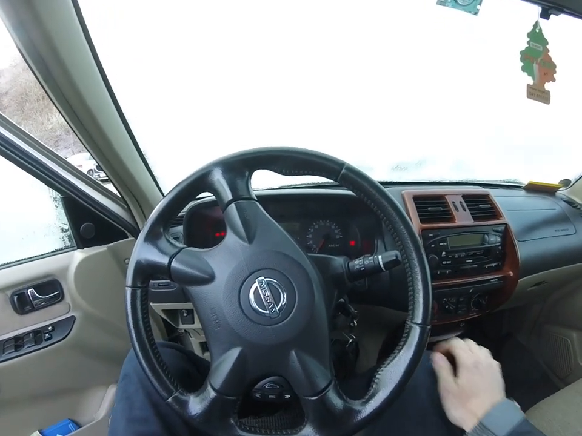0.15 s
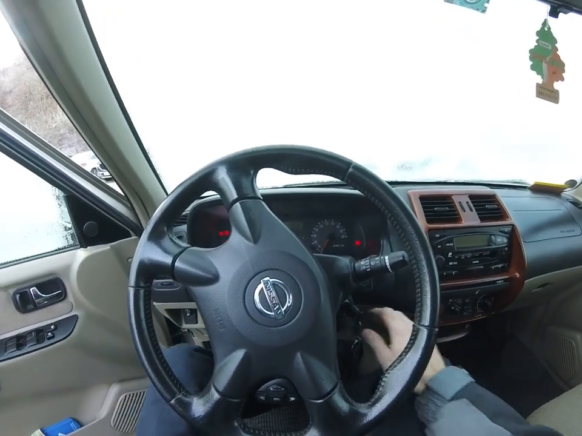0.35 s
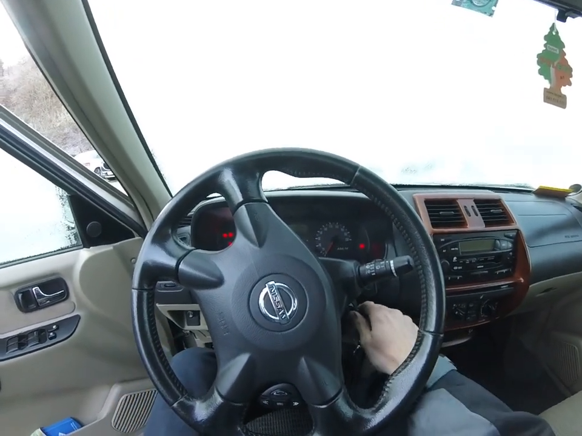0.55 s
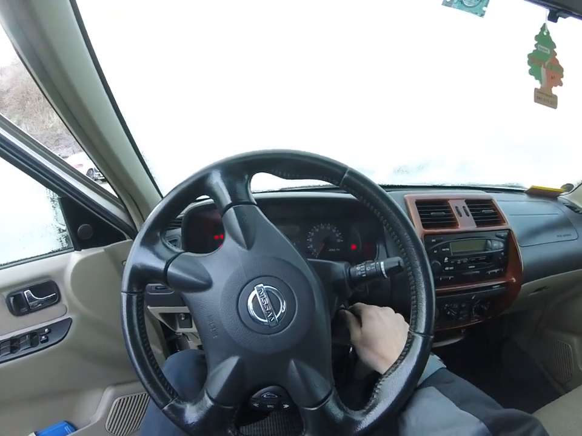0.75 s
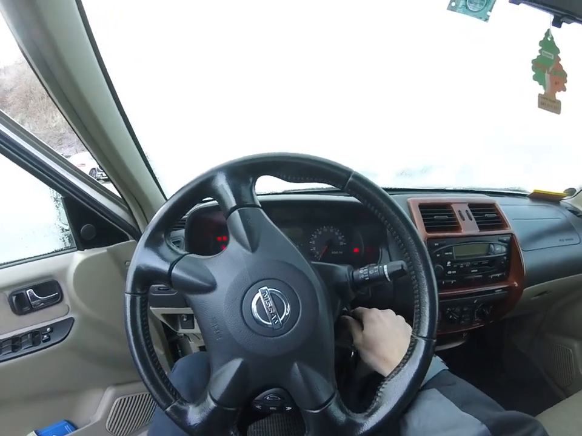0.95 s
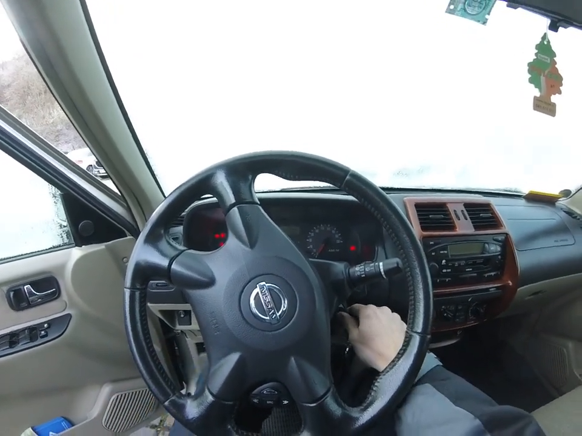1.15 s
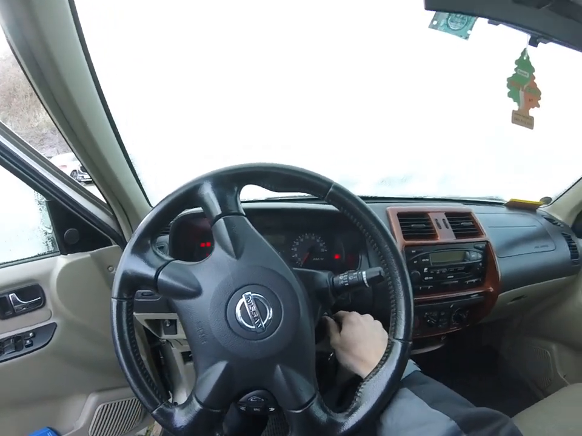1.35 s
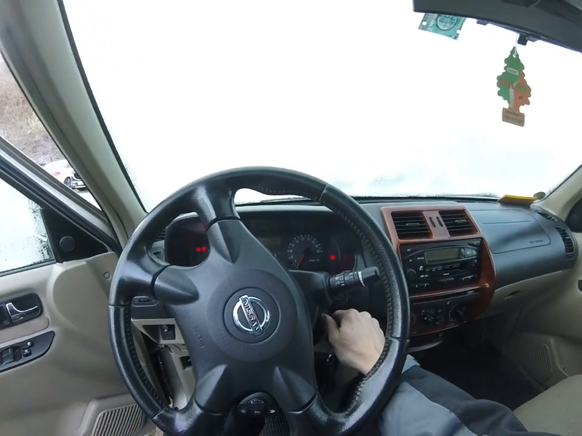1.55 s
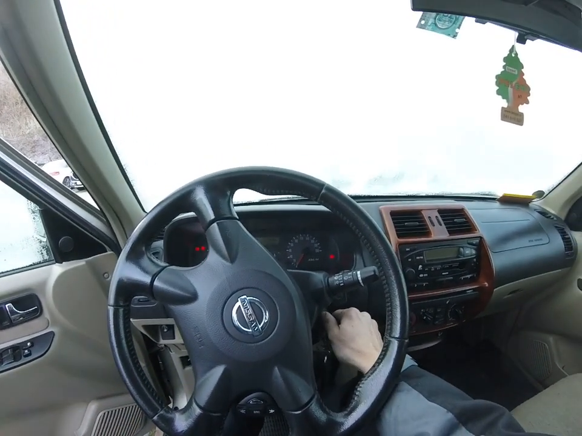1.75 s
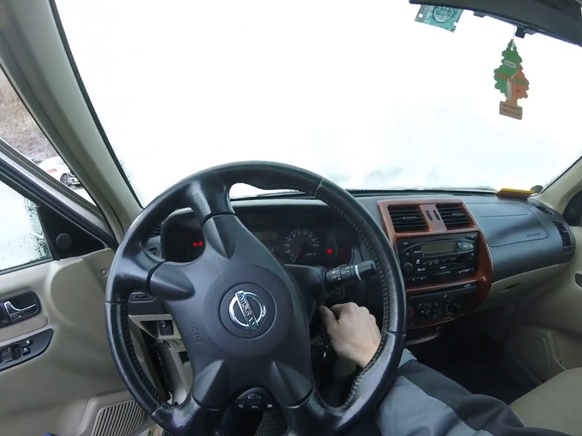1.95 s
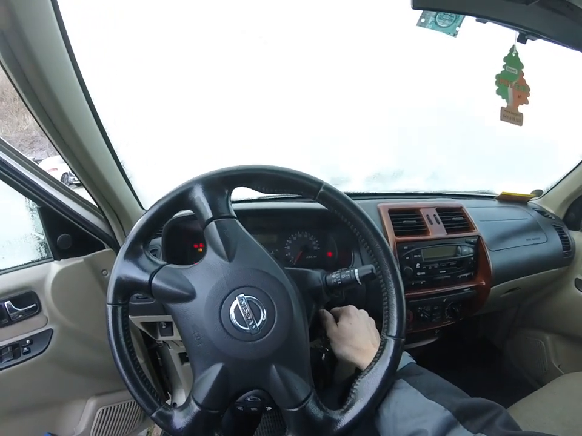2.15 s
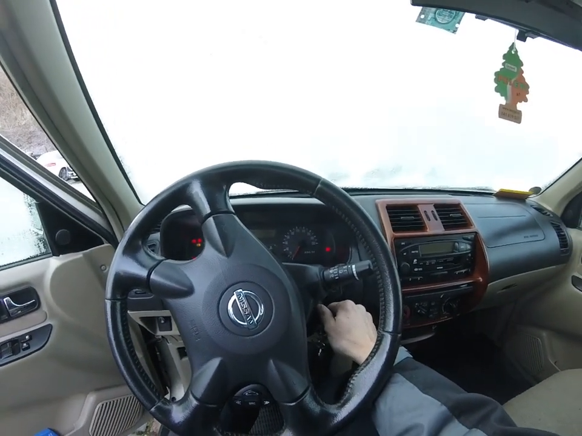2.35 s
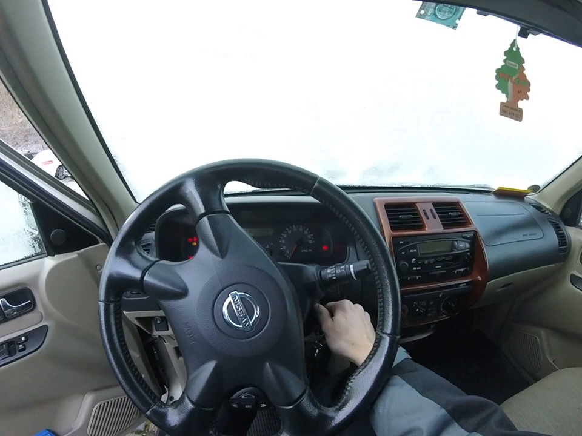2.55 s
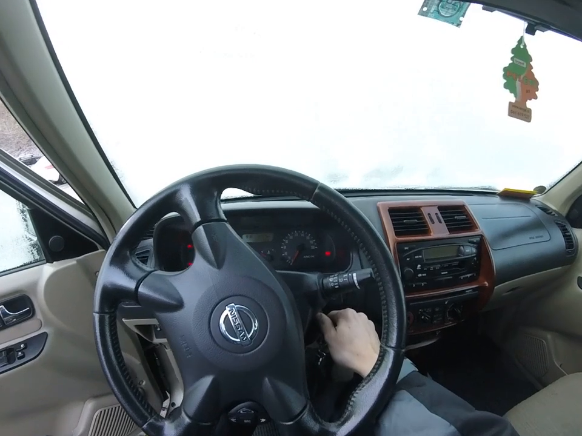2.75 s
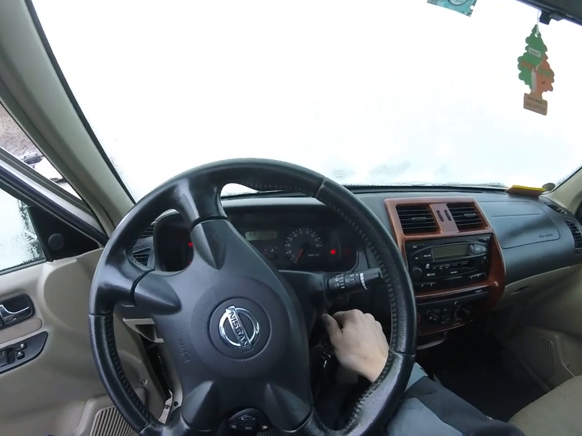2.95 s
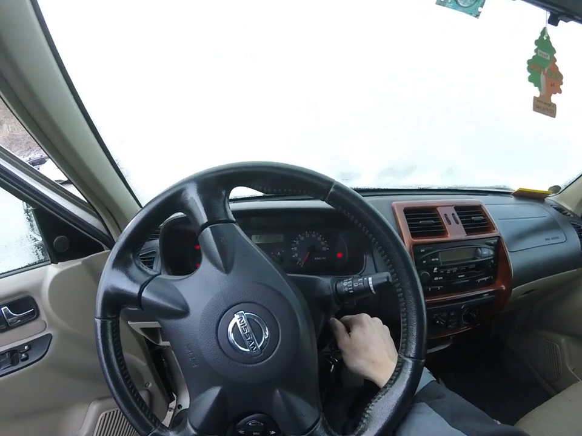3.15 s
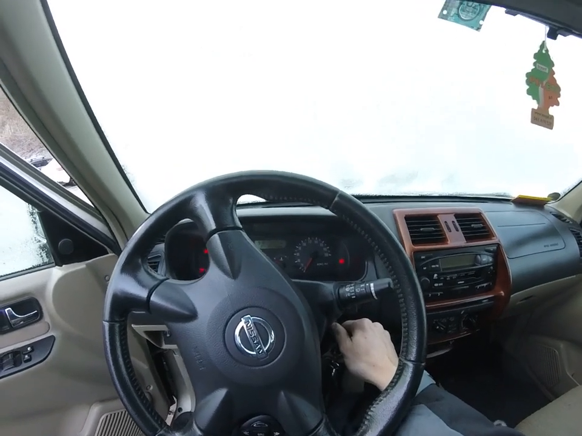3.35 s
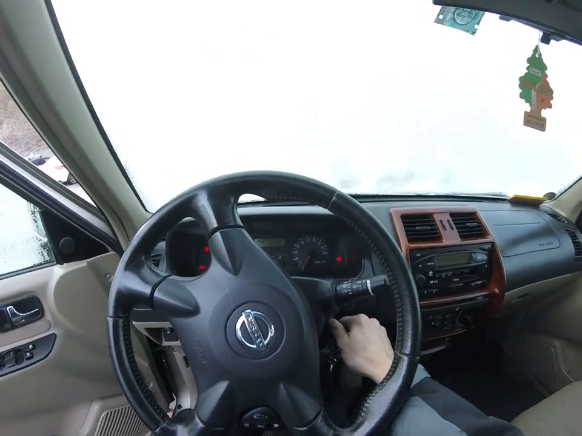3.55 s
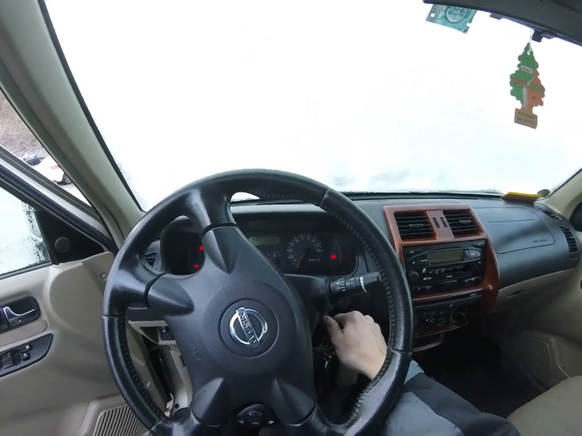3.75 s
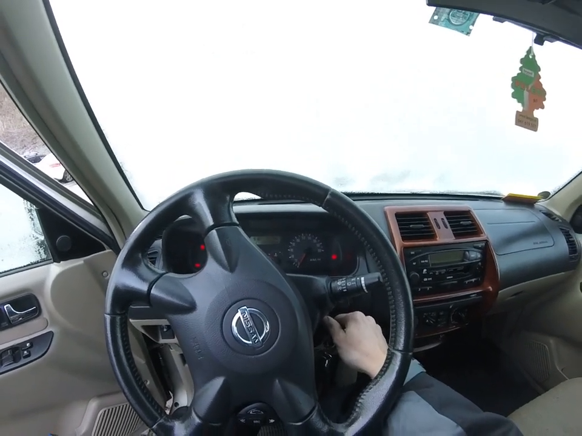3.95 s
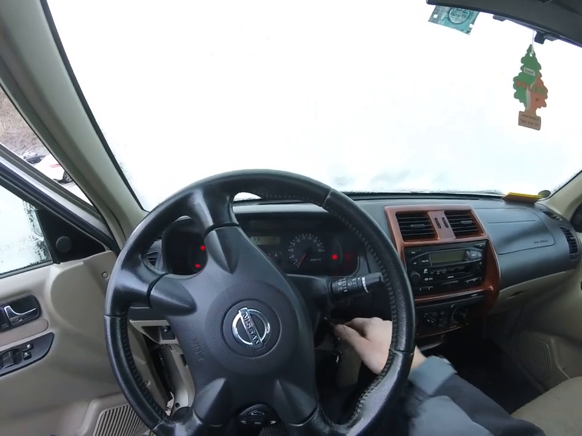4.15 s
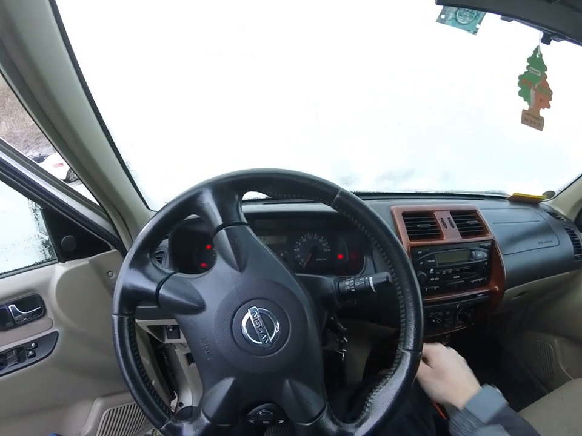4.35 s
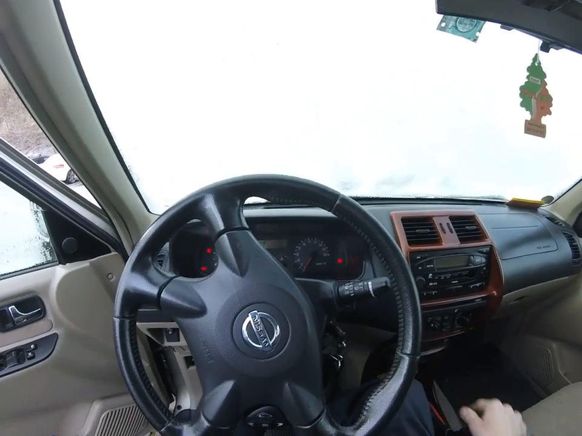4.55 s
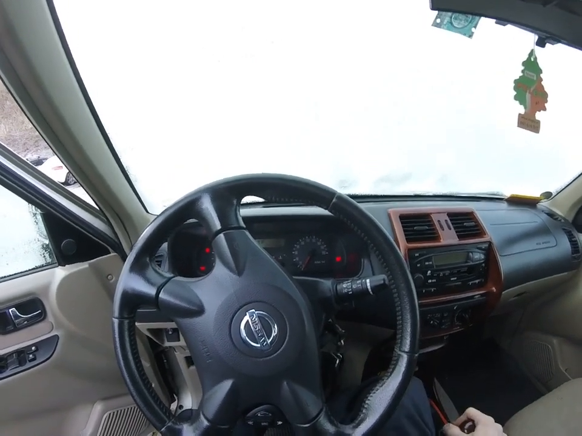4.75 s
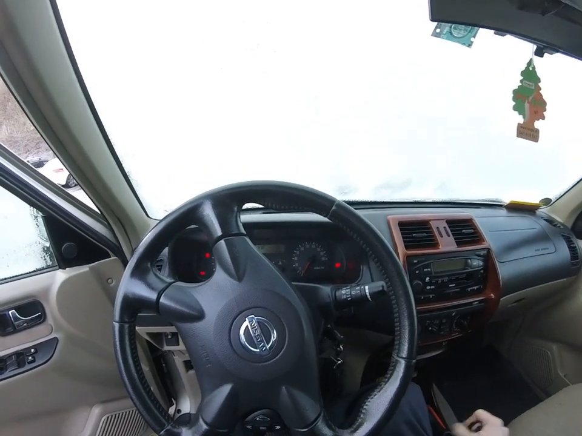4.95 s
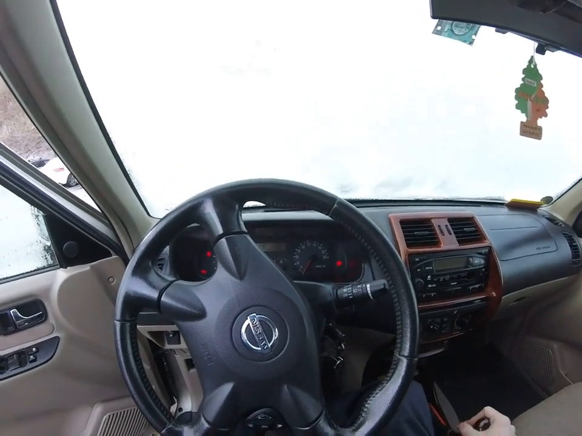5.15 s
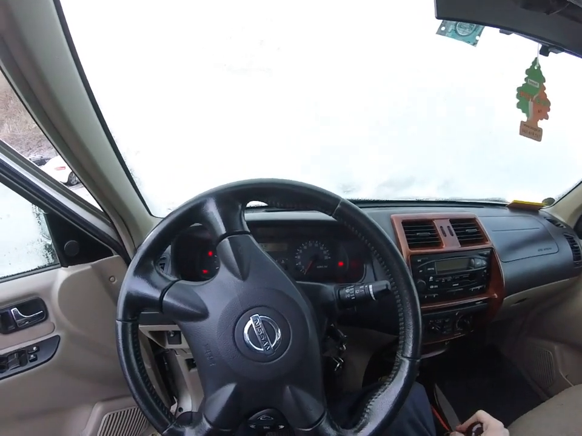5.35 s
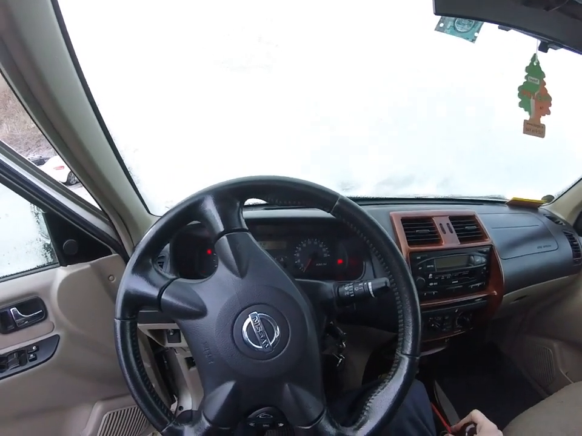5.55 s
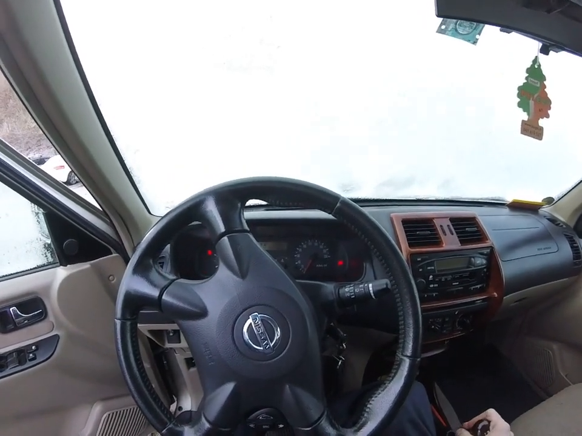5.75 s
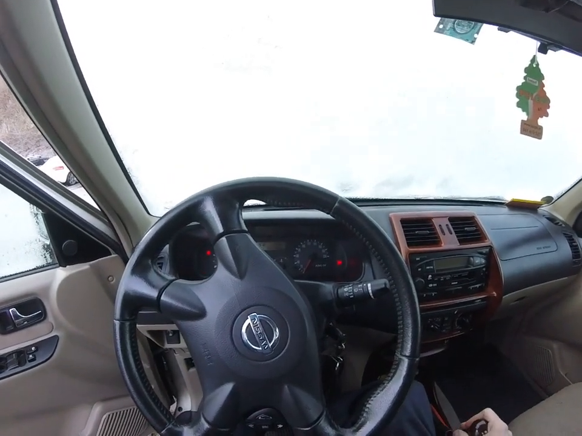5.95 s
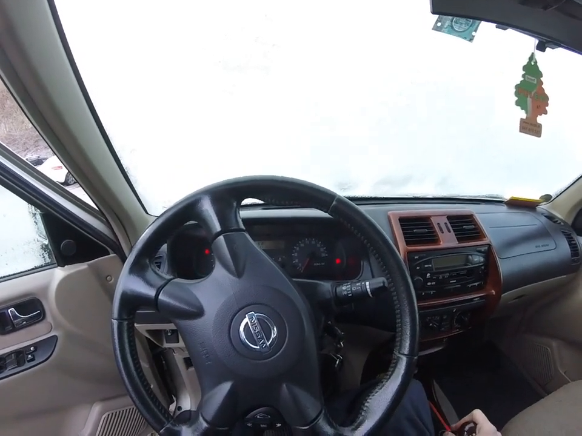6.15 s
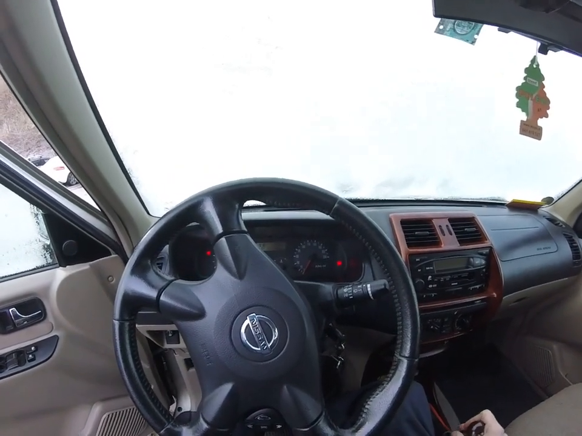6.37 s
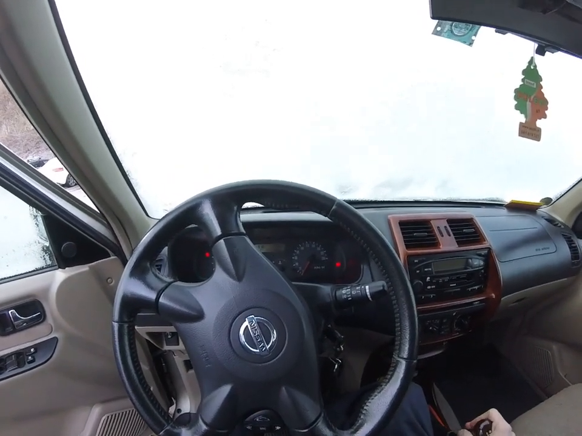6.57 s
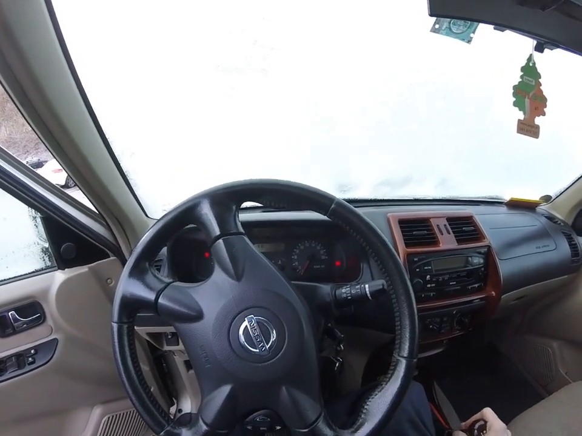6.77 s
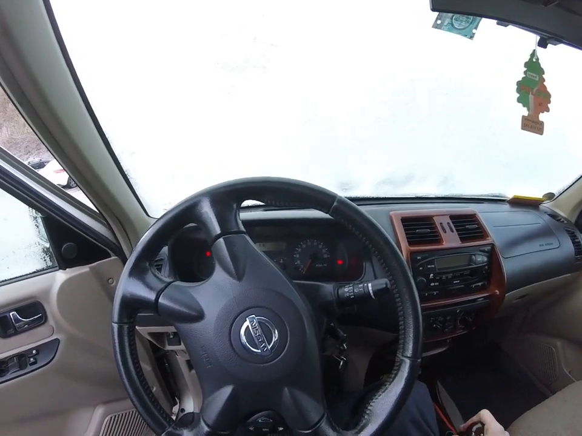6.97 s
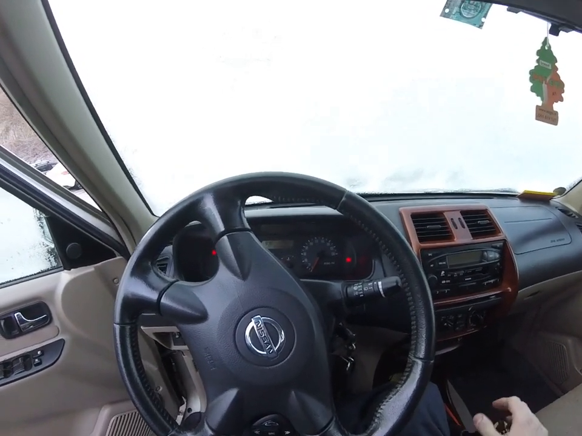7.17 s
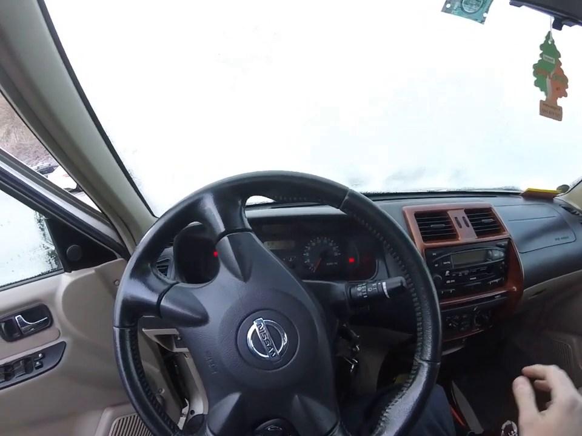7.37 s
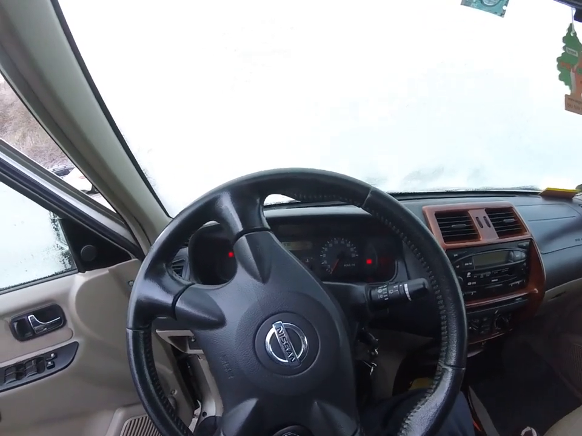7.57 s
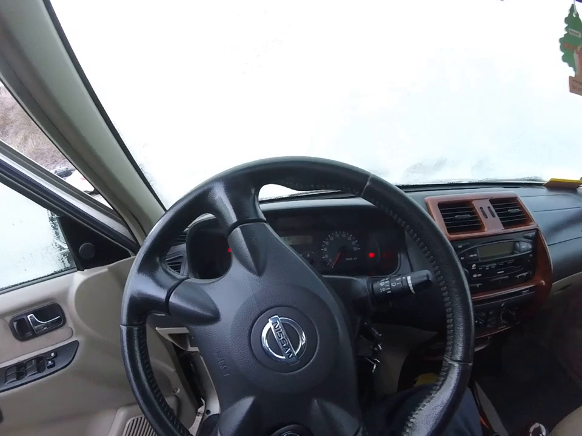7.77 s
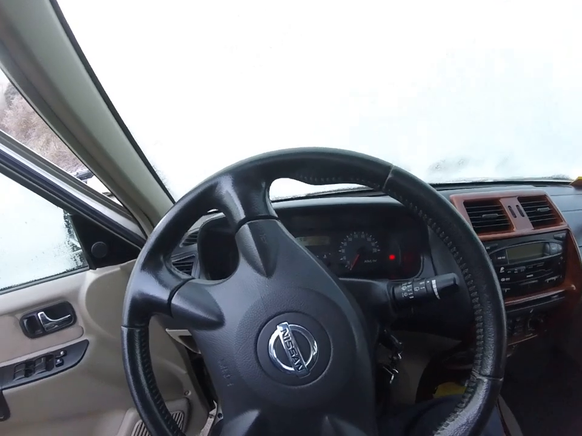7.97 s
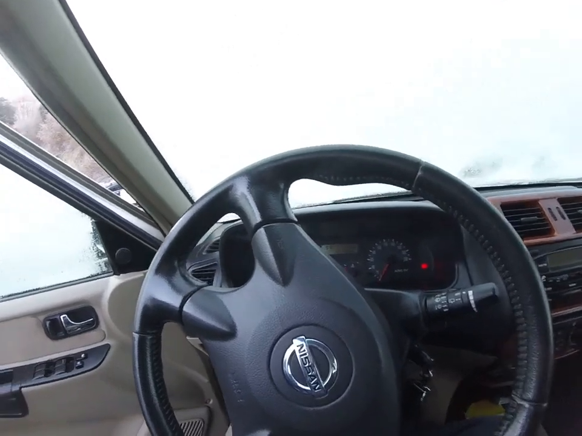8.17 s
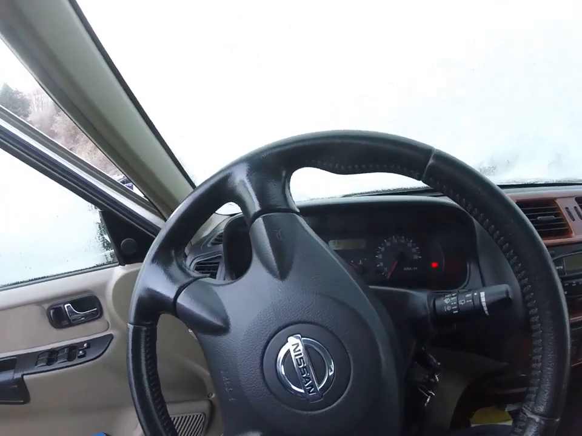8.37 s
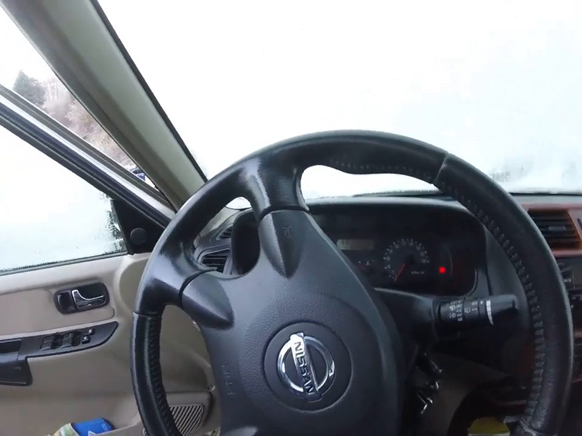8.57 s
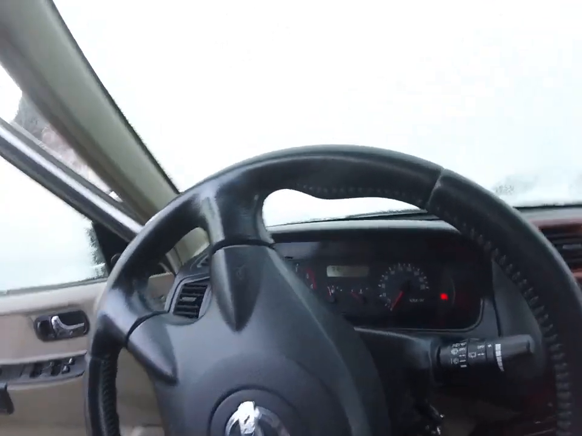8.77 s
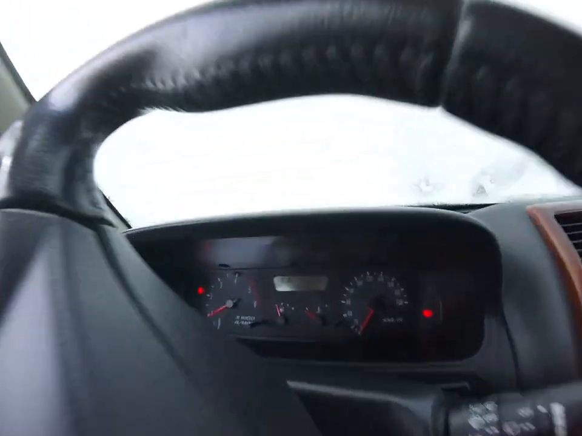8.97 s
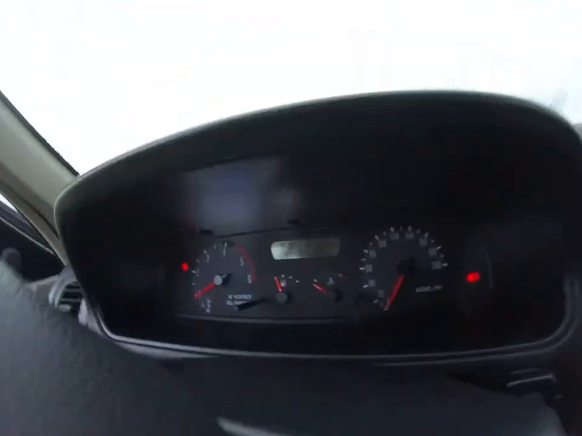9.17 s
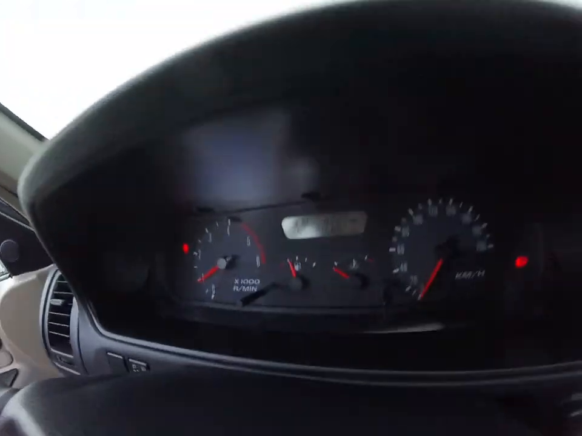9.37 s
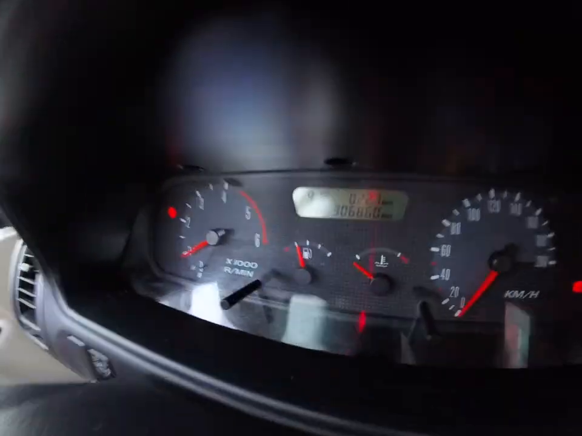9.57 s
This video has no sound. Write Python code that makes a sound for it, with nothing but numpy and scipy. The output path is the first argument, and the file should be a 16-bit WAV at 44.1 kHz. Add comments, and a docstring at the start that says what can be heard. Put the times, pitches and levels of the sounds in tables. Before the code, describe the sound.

Inside a closed car cab, mono and close. From 0 to 1.7 s it is nearly quiet: faint air, cloth rustle, a tiny wavering creak at 0.1-0.3, a dull bump at 0.3, then small thuds and key ticks. At 1.75 the starter whines up with a clunk, dips, and from 2.1 grinds in gritty surges about six a second, each with a low body thud. Around 3.4 the first firings break in; by 3.7 hard knocks, boom and bright rattle take over. Revs peak near 4.1, sag by 5.2, rise at 5.8, dip at 6.2 with hard knocks, and flare slightly at 7.1. Then a steady low diesel idle, about thirty firings a second, with clatter and faint panel hum. A bump comes at 7.7, light rattles near 8, a sharp plastic double click at 8.6, and a soft thud at 9.1; the knock turns boxier as the idle continues to the end, about 9.6.

```python
"""A starter grinds over the compressions of a cold four-cylinder diesel, which catches, hunts up and down
and settles to idle, heard inside the cab. Starter: gear-mesh harmonics blurred by noise, over filtered grind.
Engine: sines at multiples of the firing rate, and noise bursts at each firing for boom, knock and rattle.
Around them: body sway, air and rustle, a creak, decaying thuds and ticks, humming trim and plastic clicks."""
import sys
import numpy as np
from scipy import signal
from scipy.fft import rfft, irfft, next_fast_len
from scipy.io import wavfile
from scipy.ndimage import uniform_filter1d

SR = 44100
rng = np.random.default_rng(int(sys.argv[2]) if len(sys.argv) > 2 else 0)


def digitize_waveform(pressure):
    """Quantize a signal to 16-bit integers and store it at the path in sys.argv[1].

    Rows of a 2-D input are taken as channels; values are limited to [-1, 1].
    """
    field = np.atleast_2d(pressure).T
    bounded = np.clip(field, -1, 1)
    quanta = np.round(bounded * 32767).astype(np.int16)
    wavfile.write(sys.argv[1], SR, quanta)


N = 424241
T = np.arange(N) / SR  # time (s)

# compressions that load the pinion: start_s, level_db, fade_s, mesh_hz, speed_loss_share_per_s
COMPRESSIONS = [(2.095, -33, 0.1, 1520, 4.36), (2.267, -33, .11, 1530, 4.2),
                (2.442, -33.5, 0.11, 1540, 4.45), (2.621, -34, 0.1, 1558, 5.43),
                (2.792, -33, 0.1, 1578, 5.06), (2.961, -34, .11, 1585, 5.1), (3.13, -34, 0.14, 1595, 5.14),
                (3.315, -32, 0.055, 1577, 7.5)]
# low spectrum of the shaken body: frequency_hz, relative_density_db
BODY_DRONE = [(24, -15), (40, -7), (70, -3.5), (107, -5), (150, -7), (210, -11.5), (257, -18.5), (311, -18),
              (431, -30), (500, -25.5), (650, -94), (1100, -120)]
# resonances of the cab panels: centre_hz, width_hz, lift_db
CAB_PANELS = [(123, 120, -3), (204.1, 15, 10.5), (312, 140, 2)]
# treble spectrum of rattles and ticks: frequency_hz, relative_density_db
RATTLE_SPECTRUM = [(2060, -21), (3500, -6.5), (4080, -31), (4380, -7.5), (5280, 3.5), (6090, 3), (6580, 1),
                   (8380, -11), (11700, -29), (13000, -81)]


def undb(db):
    """Amplitude ratio, by the definition of the decibel."""
    return 10 ** (np.asarray(db) / 20)


def level(x, db=0):
    """Scale x to an rms level, the root of its mean power."""
    return x * undb(db) / np.sqrt(np.mean(x ** 2))


def curves(rows, **ends):
    """Linear interpolation in time of each column after the first."""
    seconds, *columns = np.transpose(rows)
    return [np.interp(T, seconds, column, **ends) for column in columns]


def colour(x, spectrum, peaks=()):
    """Linear filtering: multiply the spectrum by a curve with resonant humps; rms 1."""
    size = next_fast_len(N)
    f = np.maximum(np.arange(size // 2 + 1) * SR / size, 1)
    hz, db = np.transpose(spectrum)
    gain_db = np.interp(np.log(f), np.log(hz), db, left=-90, right=-90)
    for centre, width, lift in peaks:
        gain_db = gain_db + lift / (1 + (2 * (f - centre) / width) ** 2)
    return level(irfft(rfft(x, size) * undb(gain_db), size)[:N])


def noise():
    """White noise: equal mean power at every frequency."""
    return rng.standard_normal(N)


def walk(rate):
    """Smoothed random modulation: values held 1 / rate s and averaged twice; spread near 1."""
    k = int(SR / rate)
    steps = np.repeat(rng.standard_normal(N // k + 1), k)
    return 0.774 * uniform_filter1d(uniform_filter1d(steps, k), k)[:N]


def swell(s, db, rise, fall):
    """Power of an exponential hump at s; its amplitude grows and dies by e in rise and fall."""
    return undb(2 * db) * np.exp(2 * np.minimum((T - s) / rise, (s - T) / fall))


def decay(t, t60, rise):
    """Damped response to a blow: a short rise under an exponential fall of 60 dB in t60."""
    return 1000. ** (-t / t60) * (1 - np.exp(-t / rise))


def half_second(s):
    """Samples of the half second in which a blow at s dies away."""
    start = int(s * SR)
    return slice(start, start + SR // 2)


def pad(x):
    """Extend x by a second of silence so that late blows fit."""
    return np.append(x, np.zeros(SR))


def cabin():
    """Broadband noise: inertial sway of the body, still air in the cab and the rustle of clothes."""
    # lurches of the body: peak_s, level_db
    lurch_rows = [(.36, -43), (.67, -40), (.82, -43), (.94, -56), (1.09, -45), (1.25, -46), (1.36, -53),
                  (1.78, -33), (1.89, -27), (3.46, -19), (3.61, -16.5), (3.8, -19.5), (3.87, -22.5),
                  (4.09, -24.5)]
    # sway spectrum: frequency_hz, relative_density_db
    sway_spectrum = [(6, -32), (12, 4), (20, 7), (28, 4), (38, -0.5), (50, 2.5), (65, -23.5), (90, -14)]
    # still cab: time_s, air_db, rustle_db
    cabin_levels = [(0.0, -58.5, -65), (0.134, -51, -53.5), (0.296, -53, -60), (0.536, -54.5, -58),
                    (0.656, -55, -61.5), (0.886, -57.5, -64), (1.01, -55.5, -62), (1.206, -54, -62.5),
                    (1.532, -56, -62), (1.72, -54, -62)]
    # spectra of air and rustle: frequency_hz, relative_density_db
    air_spectrum, rustle_spectrum = [(24, -47), (40, -23), (55, -2.5), (76, -11.5), (163, -16.5),
                                     (275, -21.5), (1260, -32.5), (1590, -31.5), (4200, -41), (5460, -80),
                                     (9240, -120)], [(1760, -56), (3000, -8), (4500, -17), (5020, -1.5),
                                                  (5590, -1.5), (6430, -2.5), (7980, -3.5), (12500, -18),
                                                  (13700, -35)]
    # microphone port resonance: centre_hz, width_hz, lift_db
    port_peak = [(6470, 290, 11.5)]
    rise_s, fall_s, still_db = 0.052, 0.076, -51.5
    # each compression rocks the body a moment later
    rock_lag_s, rock_db = 0.036, -29.5
    lurches = lurch_rows + [(row[0] + rock_lag_s, rock_db) for row in COMPRESSIONS]
    power = undb(2 * still_db) + sum(swell(s, db, rise_s, fall_s) for s, db in lurches)
    sway = np.sqrt(power) * colour(noise(), sway_spectrum)
    air_db, rustle_db = curves(cabin_levels)
    air = undb(air_db) * colour(noise(), air_spectrum)
    rustle = undb(rustle_db + 1.6 * walk(10)) * colour(noise(), rustle_spectrum, port_peak)
    return sway + air + rustle


def creak():
    """Stick-slip friction as the driver leans: a faint, uneven tone with a weak octave."""
    # creak: time_s, pitch_hz, level_db
    slip_rows = [(.12, 553, -70), (.15, 533, -58), (.185, 469, -53), (.21, 531, -58), (.25, 535, -54),
                 (.28, 537, -62), (.3, 522, -72)]
    hz, db = curves(slip_rows, right=0)
    phase = 2 * np.pi * np.cumsum(hz * (1 + 0.045 * walk(122.0))) / SR
    on = (T > slip_rows[0][0]) & (T < slip_rows[-1][0])
    tone = np.sin(phase) + 0.29 * np.sin(2 * phase)
    return on * undb(db + 3 * walk(57)) * tone


def thuds():
    """Modal response to dull blows through seat and body: one damped low mode and a scuff."""
    # thuds: start_s, level_db, pitch_hz, scuff_relative_db
    thud_rows = [(0.318, -30, 380, 0), (0.319, -43, 656, -10), (0.322, -33, 114, 2.5),
                 (0.336, -37, 69.4, -14), (.619, -31.5, 150, -2), (.63, -46, 720, -10),
                 (0.807, -45.5, 185, 1), (1.056, -45.5, 346, 5), (1.148, -35, 133, -9),
                 (1.267, -48, 136, 11), (1.326, -47.5, 196, 1), (1.488, -46.5, 189, 4),
                 (1.732, -25, 124.6, -7), (1.951, -22.5, 181, -1.5), (2.118, -21.5, 129.4, -23),
                 (2.272, -25.5, 175.3, 2.5), (2.461, -38, 113.2, -23), (2.591, -25, 130.3, -18),
                 (2.648, -31.5, 173, -27), (2.936, -27, 125.8, -29), (2.989, -38, 124, 2),
                 (3.153, -37.5, 131, -14), (3.314, -21.5, 129.4, -8), (3.408, -29, 140.4, 2),
                 (3.563, -46, 120, -6), (3.694, -18.5, 132.5, -6), (3.811, -28.5, 179, 7.5),
                 (3.913, -41, 136, -6.5), (4.017, -18.5, 120.5, -25), (7.657, -26, 198, -20),
                 (7.87, -31, 59, 0), (9.12, -26, 88, -4)]
    # scuff spectrum: frequency_hz, relative_density_db
    scuff_spectrum = [(30, 14.5), (60, 6), (120, 7), (200, -2.5), (370, -10.5), (600, -25), (1500, -31.5)]
    cycles_to_fall_60_db, rise_s = 30, 0.0027
    out, t = np.zeros(N + SR), np.arange(SR // 2) / SR
    scuff = pad(colour(noise(), scuff_spectrum))
    for s, db, hz, scuff_db in thud_rows:
        at = half_second(s)
        ring = np.sin(2 * np.pi * hz * t) + undb(scuff_db) * scuff[at]
        out[at] += undb(db) * ring * decay(t, cycles_to_fall_60_db / hz, rise_s)
    return out[:N]


def ticks():
    """Impulsive contact of key, switch and trim: short noise bursts in a middle and a high band. The bursts at
    3.567 and 3.718 s fall on hard firings of the engine and add to their attack."""
    # ticks: start_s, level_db, treble_relative_db, t60_s
    tick_rows = [(.34, -43, -4, 0.096), (1.064, -58, 5.5, 0.058), (1.303, -45.5, -8.5, 0.084),
                 (1.475, -50, -16, 0.049), (1.491, -49, -6, 0.058), (1.551, -51, -8, .04),
                 (1.619, -57, 15.5, 0.08), (1.74, -50, 9.5, 0.18), (3.489, -46, 11, 0.047),
                 (3.567, -45.5, 7, 0.066), (3.718, -38, -12, 0.046), (4.027, -38, 3.5, 0.16),
                 (4.064, -48, 15.5, 0.033), (7.769, -45.5, 5, 0.029), (8.625, -39.5, 5, 0.015),
                 (9.163, -42, 5, 0.011)]
    # middle band: frequency_hz, relative_density_db
    snap_spectrum = [(400, 5), (900, 8), (1700, 6), (2500, 3.5), (4300, -12), (6000, -16)]
    rise_share = 0.022  # of t60
    out, t = np.zeros(N + SR), np.arange(SR // 2) / SR
    middle = pad(colour(noise(), snap_spectrum))
    high = pad(colour(noise(), RATTLE_SPECTRUM))
    for s, db, high_db, t60 in tick_rows:
        at = half_second(s)
        burst = middle[at] + undb(high_db) * high[at]
        out[at] += undb(db) * burst * decay(t, t60, rise_share * t60)
    return out[:N]


def starter():
    """Gear-mesh whine and grind, amplitude and frequency modulated by the load of each compression."""
    # pulling up from rest: time_s, mesh_hz, level_db, whine_relative_to_grind_db, clean_share
    spin_up = [(1.735, 698, -39, -17, 0), (1.78, 842, -35.5, -19, 0.54), (1.83, 938, -35.5, -12, 0),
               (1.87, 1008, -41.5, -2, 1.3), (1.91, 994, -38, -14, 1.8), (1.96, 713, -38.5, -1.5, 0.34),
               (2.0, 677, -41, -7.5, 0.97), (2.04, 650, -63, -3.5, 0), (2.07, 646, -73, 4, 0.17)]
    # relative level_db of mesh harmonics 1 to 6
    teeth_db = [4.5, 8.5, 5.5, 9, 8.5, 4.5]
    # grind spectrum: frequency_hz, relative_density_db
    grind_spectrum = [(180, -27), (300, 1), (428, -14), (484, -7), (844, -5), (926, 0.5), (1280, -6.5),
                      (1430, -1), (1690, -9.5), (2770, -10.5), (3890, -14.5), (4330, -20.5), (6470, -6),
                      (10300, -37), (12000, -37), (15600, -86), (22000, -120)]
    # starter housing resonances: centre_hz, width_hz, lift_db
    housing_peaks = [(950, 35, 5), (1470, 22, -3), (1732, 21, 10), (2284, 13, 13), (2580, 81, 4),
                     (3000, 26, 8.5), (5850, 8.9, 15.5), (7200, 67, -3)]
    lead_s, rise_s = .008, .012
    whine_db_under_load, whine_hold_s, whine_fade_db_per_s = -2, .08, 200
    hz, db, whine_db, clean = curves(spin_up)
    held = np.zeros(N)
    load = undb(db) * (T > spin_up[0][0]) * (T < spin_up[-1][0])
    for s, stroke_db, fade_s, mesh_hz, loss in COMPRESSIONS:
        since = T - s
        u = since / fade_s
        on = (since > -lead_s) & (u < 1.4)
        # the teeth slow as the compression resists
        hz = np.where(on, mesh_hz * (1 - loss * np.clip(since, 0, .085)), hz)
        whine_fade = whine_fade_db_per_s * np.maximum(since - whine_hold_s, 0)
        whine_db = np.where(on, whine_db_under_load - whine_fade, whine_db)
        held = np.where(on, .3, held)
        # a gentle fall, then a steeper one as the engine overruns
        fade_db = np.minimum(-8 * u - 14 * np.clip((u - .8) / 0.43, 0, 2), 0)
        onset = np.clip((since + lead_s) / rise_s, 0, 1)
        load = load + on * undb(stroke_db + fade_db) * onset
    phase = 2 * np.pi * np.cumsum(hz * (1 + .04 * walk(55))) / SR
    # under load the two lowest harmonics keep a patchy clean core
    core = held * undb(7 * walk(60))
    teeth = 0
    for k, tooth_db in enumerate(teeth_db, 1):
        # worn teeth meet unevenly: each harmonic is a blurred band, wider the higher it lies
        blur_rate = 420 + 120 * (k - 1)
        blur = walk(blur_rate) + 1j * walk(blur_rate)
        carrier = clean * min(k / 2, 1) + core * (k <= 2) + blur
        teeth = teeth + undb(tooth_db) * np.real(carrier * np.exp(1j * k * phase))
    scrape = noise() * undb(2.8 * walk(220))
    grind = colour(undb(whine_db) * level(teeth) + scrape, grind_spectrum, housing_peaks)
    shudder = undb(-9) * colour(noise(), BODY_DRONE, CAB_PANELS)
    # a steady unloaded grind carries on between compressions
    spinning = (T > spin_up[0][0]) * np.clip((3.45 - T) / 0.091, 0, 1) * undb(-53.5)
    return load * (grind + shudder) + spinning * colour(noise(), grind_spectrum, housing_peaks)


def engine():
    """Periodic excitation: one clock of firings drives orders, boom, knock, ping and rattle."""
    # engine speed, hunting around its idle: time_s, firing_rate_hz
    speed_rows = [(3.7, 31.1), (3.9, 36), (4.07, 37.6), (4.18, 35.6), (4.4, 35.3), (4.55, 36.3),
                  (4.7, 34.9), (4.8, 33.4), (5.18, 29.5), (5.49, 32.2), (5.77, 36.2), (6.03, 32.5),
                  (6.24, 29.6), (6.4, 31.8), (6.62, 30.2), (6.92, 30.8), (7.14, 34.8), (7.27, 31.5),
                  (7.56, 30.1), (8.32, 30.7), (9.45, 30.3), (9.6, 29.6)]
    # strength of combustion: time_s, knock_level_db
    burn_rows = [(3.36, -50), (3.47, -46), (3.49, -43), (3.57, -38.5), (3.65, -45), (3.715, -47),
                 (3.725, -38.5), (3.79, -40), (3.81, -39.5), (3.9, -42), (4.04, -42), (4.11, -46),
                 (4.56, -43.5), (5.12, -46.5), (5.71, -44), (6.57, -47.5), (7.11, -47.5), (7.51, -47.5),
                 (8.5, -47.5), (9.62, -48)]
    cold_boom_db, running_boom_db, boom_db_per_hz, idle_hz = 4.5, 8, 0.1, 30  # boom against knock
    hz, = curves(speed_rows)
    knock_db, = curves(burn_rows, left=-120)
    turns = np.cumsum(hz) / SR  # firings so far
    since, firing = turns % 1, turns.astype(int)
    # every firing has its own strength
    size = undb(np.clip(2.1 * rng.standard_normal(firing[-1] + 1), -5, 3.5))[firing]
    burst = size * np.exp(-since / .45) * np.clip(since / .15, 0, 1)
    caught = np.interp(T, [3.6, 4.0], [0, 1])
    warm_boom_db = running_boom_db + boom_db_per_hz * (hz - idle_hz)
    boom_db = knock_db + cold_boom_db + caught * (warm_boom_db - cold_boom_db)
    boom = undb(boom_db) * colour((1.1 + burst) * noise(), BODY_DRONE, CAB_PANELS)
    combustion = undb(knock_db) * (knocks(turns) + clatter(turns) + chamber_ping(burst))
    orders = caught * firing_orders(hz, turns, speed_rows[0][0])
    return boom + combustion + loose_parts(burst) + orders + mount_bounce()


def knocks(turns):
    """Structure-borne impact noise: each firing strikes every band of the block unevenly."""
    # edges of neighbouring bands: frequency_hz
    band_edges = (150, 450, 750, 1100, 1500, 2000, 2800, 8000)
    # times between which one colour fades into the next, in pairs: time_s
    settle_times = (3.9, 4.3, 6.5, 7.7, 8.95, 9.15)
    # spectra of first cold firings and of running: frequency_hz, relative_density_db
    cold_spectrum, running_spectrum = [(180, -18), (300, 4), (428, -7.5), (1020, -9.5), (1220, -19),
                                       (1740, -12), (2110, -18.5), (2360, -16.5), (4300, -22.5),
                                       (5590, -42), (9460, -120)], [(180, -57), (300, -1), (438, -14.5), (662, -11),
                                                           (874, -20), (977, -13), (1250, -21.5),
                                                           (1360, -15.5), (4300, -36.5), (5590, -82),
                                                           (9460, -120)]
    # spectra with the microphone near the wheel and at the dials: frequency_hz, relative_density_db
    wheel_spectrum, dials_spectrum = [(180, -13.5), (300, -4), (433, -7.5), (463, -10.5), (1260, -14),
                                      (1380, -20), (1560, -21), (2490, -24.5), (4300, -36.5), (5590, -67),
                                      (9460, -120)], [(180, -23), (300, 1), (396, 1.5), (524, -17),
                                                          (605, -4.5), (827, -14), (1290, -7), (1670, -18),
                                                          (2630, -19.5), (4300, -30), (5590, -62),
                                                          (9460, -120)]
    # resonances of the block and of the parts near the wheel: centre_hz, width_hz, lift_db
    block_peaks, wheel_peaks = [(890, 5.6, 13.5), (1020, 27, 5.5), (1150, 24, 1.5), (1315, 9.2, 8),
                                (1650, 13, 4), (2380, 66, 5.5), (2620, 180, 5.5), (2855, 34, 9)], [(2480, 32, 9.5)]
    scatter_db, longest_lag = 3.5, .3  # lag in firing periods
    struck, force = 0, rng.standard_normal(int(turns[-1]) + 2)
    for band in zip(band_edges, band_edges[1:]):
        since = (turns - longest_lag * rng.random()) % 1
        # partly the force of the whole firing, partly that of this band
        mixed = np.clip(.4 * force + .9 * rng.standard_normal(len(force)), -2, 1.6)
        size = undb(scatter_db * mixed)[np.round(turns - since).astype(int) + 1]
        band_filter = signal.butter(2, band, "band", fs=SR, output="sos")
        envelope = .7 + size * np.exp(-since / .4) * np.clip(since / .12, 0, 1)
        struck = struck + signal.sosfilt(band_filter, noise()) * envelope
    stage = np.interp(T, settle_times, [0, 1, 1, 2, 2, 3])
    colours = [(cold_spectrum, ()), (running_spectrum, block_peaks),
               (wheel_spectrum, wheel_peaks), (dials_spectrum, ())]
    out = 0
    for k, (spectrum, peaks) in enumerate(colours):
        share = np.clip(1 - abs(stage - k), 0, 1) ** .7
        out = out + share * colour(struck, spectrum, peaks)
    return out


def clatter(turns):
    """Impulse response of damped resonators: each firing taps each part with its own force and lag."""
    # ringing parts: pitch_hz, relative_level_db
    part_rows = [(620, 1), (760, -5.5), (1000, -2.5), (1170, -5), (1380, 0.5), (1540, -1), (1760, -3),
                 (2400, -11.5), (2650, -8.5)]
    t60_s, scatter_db, longest_lag_s = 0.24, 5, .013
    fired, out = np.flatnonzero(np.diff(turns.astype(int))), 0
    for hz, db in part_rows:
        taps = np.zeros(N + SR)
        force, lag = rng.standard_normal(len(fired)), rng.random(len(fired))
        at = fired + (lag * longest_lag_s * SR).astype(int)
        taps[at] = undb(db + scatter_db * np.clip(force, -2, 2))
        pole = np.exp(2j * np.pi * hz / SR - np.log(1000) / (t60_s * SR))
        out = out + signal.lfilter([1], [1, -pole], taps[:N]).imag
    return level(out, -13)


def chamber_ping(burst):
    """Cavity resonance of the cylinder gas: banded noise that stresses the harder firings."""
    # gas resonance: frequency_hz, relative_density_db
    gas_spectrum = [(1100, -31), (1300, 12), (1550, 10), (1800, -3), (2100, -34)]
    return undb(-15) * colour(burst ** 1.4 * noise(), gas_spectrum)


def loose_parts(burst):
    """Vibro-impact of loose parts: treble noise pulsed by the firings, with brief flares."""
    # rattle, loud until the key is let go: time_s, level_db
    rattle_levels = [(3.36, -60), (3.4, -50), (3.57, -46.5), (3.66, -48), (3.88, -43), (4.0, -46),
                     (4.05, -47), (4.11, -54), (4.77, -51.5), (4.82, -58), (5.71, -58), (7.5, -58.5),
                     (8.5, -62), (8.92, -54), (9.57, -57)]
    # flares: peak_s, level_db, fall_s
    flare_rows = [(7.887, -52.5, 0.032), (8.008, -51, 0.13), (9.254, -57, 0.07)]
    # rattle humps: centre_hz, width_hz, lift_db
    loose_peaks = [(5500, 150, 4), (6580, 68, 9.5)]
    sound = colour((1.0 + burst) * noise() * undb(2.34 * walk(12)), RATTLE_SPECTRUM, loose_peaks)
    rattle_db, = curves(rattle_levels, left=-120)
    power = undb(2 * rattle_db) + sum(swell(s, db, fall / 2, fall) for s, db, fall in flare_rows)
    return np.sqrt(power) * sound


def hard_firings():
    """Modal ringing of block and chamber gas under hard ignition, slightly detuned each time."""
    # hard firings: start_s, level_db, gas_relative_db, t60_s
    hard_rows = [(3.484, -41, -20, 0.075), (3.533, -34.5, -17, 0.086), (3.566, -41, -1, .12),
                 (3.718, -33.5, -1, 0.12), (3.762, -45.5, -3, 0.12), (3.8, -39.5, -19, .12),
                 (3.842, -37, -8, 0.15), (3.972, -42, -3, 0.14), (4.035, -59, -2, 0.1),
                 (6.047, -53, -21, 0.062), (6.077, -55, -5, .07), (6.109, -45, -11, 0.052),
                 (6.21, -36.5, -4.5, 0.062), (6.308, -43, -10, 0.065), (6.966, -38, -12, .06),
                 (6.996, -45.5, 5.5, 0.13), (7.235, -49, 0, .15)]
    # block modes: pitch_hz, relative_level_db
    mode_rows = [(420, -14), (540, -2.5), (705, -3), (860, -13.5), (1000, -2.5), (1380, -26), (2280, -12.5)]
    # chamber gas: frequency_hz, relative_density_db
    ring_spectrum = [(1450, -18), (1650, -2.5), (1820, 1), (2000, -20)]
    rise_s, detune_share, scatter_db = .0015, 0.0364, 2.5
    out, t = np.zeros(N + SR), np.arange(SR // 2) / SR
    gas = pad(colour(noise(), ring_spectrum))
    for s, db, gas_db, t60 in hard_rows:
        at = half_second(s)
        block = 0
        for hz, mode_db in mode_rows:
            strength, detune, phase = rng.standard_normal(3)
            mode_hz = hz * (1 + detune_share * detune)
            block = block + undb(mode_db + scatter_db * strength) * np.sin(2 * np.pi * (mode_hz * t + phase))
        out[at] += undb(db) * (block + undb(gas_db) * gas[at]) * decay(t, t60, rise_s)
    return out[:N]


def firing_orders(hz, turns, start_s):
    """Fourier series of the firing pulse: sines at multiples of the rate, shaped by body response."""
    # multiples of the firing rate
    order_numbers = (1, 2, 3, 4, 6, 7, 9, 10)
    # body response to an order: pitch_hz, level_db
    body_response = [(29, -30.5), (33, -34), (36, -36.5), (59, -41), (72, -39), (90, -42), (108, -57.5),
                     (120, -49), (140, -42), (180, -55), (196, -51), (210, -48), (224, -49), (240, -69),
                     (275, -62.5), (305, -58), (322, -53), (345, -66), (370, -76)]
    # swell of the orders as the governor adds and takes away fuel: time_s, gain_db
    fuel_rows = [(4.0, 2.5), (4.12, 5), (4.2, -6), (4.32, 2.5), (4.45, 1), (4.57, 8.5), (4.72, -3),
                 (5.2, -5), (5.62, 0.5), (5.74, 4), (5.84, 4), (6.0, -10), (6.18, -6), (6.28, 5),
                 (6.5, -1.5), (6.85, 0.5), (6.96, 3.5), (7.15, 3), (7.4, -1.5), (9.6, 1.5)]
    # crank orders: multiple_of_firing_rate, relative_level_db
    crank_rows = [(.5, 7.5), (1.5, -6)]
    crank_db, wander_db, wander_rate, warm_db_per_s = -42, 2, 7.2, 0.37
    fuel_db, = curves(fuel_rows)
    swell_db = fuel_db + warm_db_per_s * (T - start_s)  # orders firm up as the idle settles
    lines = []
    for k in order_numbers:
        body_db = np.interp(k * hz, *np.transpose(body_response))
        lines.append((k, body_db + swell_db + wander_db * walk(wander_rate)))
    for k, db in crank_rows:
        lines.append((k, crank_db + db + 3 * walk(4.3)))
    return sum(np.sqrt(2) * undb(db) * np.sin(2 * np.pi * (k * turns + rng.random())) for k, db in lines)


def hums():
    """Sympathetic resonance of trim panels: narrow bands of noise that fade in and out."""
    # hums: start_s, end_s, centre_hz, width_hz, level_db
    hum_rows = [(4.05, 4.95, 320, 8, -47), (4.2, 6.4, 955, 40, -63), (6.45, 7.6, 1190, 22, -58.5),
                (7.6, 9.05, 1365, 12, -57), (7.9, 9.05, 1190, 20, -63)]
    fade_s, out = 0.23, 0
    for start, end, hz, width, db in hum_rows:
        fade = np.clip(np.minimum(T - start, end - T) / fade_s, 0, 1)
        band = signal.butter(1, (hz - width / 2, hz + width / 2), "band", fs=SR, output="sos")
        out = out + fade * level(signal.sosfilt(band, noise()), db)
    return out


def mount_bounce():
    """Mass-spring motion of the running engine on its mounts: wandering infrasonic and bass noise."""
    # mount spectrum: frequency_hz, relative_density_db
    mount_spectrum = [(6, -34), (12, -3.5), (18.5, 1.5), (24, -9), (45, -13), (60, -21)]
    settled = np.clip((T - 4.3) / 0.13, 0, 1)
    return settled * undb(-35 + 6 * walk(9.1)) * colour(noise(), mount_spectrum)


def clicks():
    """Impulse response of plastic close to the microphone: single pulses, filtered."""
    # clicks: start_s, level_db
    click_rows = [(8.6258, -22), (8.6345, -28)]
    # plastic: frequency_hz, relative_density_db
    plastic_spectrum = [(500, -14), (900, -1), (1400, 0), (2000, -9), (3200, -15), (4300, -11), (5400, -8),
                        (6500, 1.5), (8500, -11), (12000, -32)]
    pulses = np.zeros(N)
    for s, db in click_rows:
        pulses[int(s * SR)] = undb(db)
    sound = colour(pulses, plastic_spectrum)
    return sound * pulses.max() / abs(sound).max()  # the loudest peak keeps its level


def scene():
    """Superposition of all sources in one channel."""
    surroundings = cabin() + creak() + thuds() + ticks()
    machinery = starter() + engine() + hard_firings()
    return (surroundings + machinery + hums() + clicks())[None]


def record(dry):
    """Band limits of a small microphone: no deepest bass, and a steep cut of the top."""
    dry = signal.sosfilt(signal.butter(2, 9, "high", fs=SR, output="sos"), dry)
    return signal.sosfilt(signal.ellip(8, .2, 70, 13800, fs=SR, output="sos"), dry)


dry = scene()
out = record(dry)
digitize_waveform(out)
```